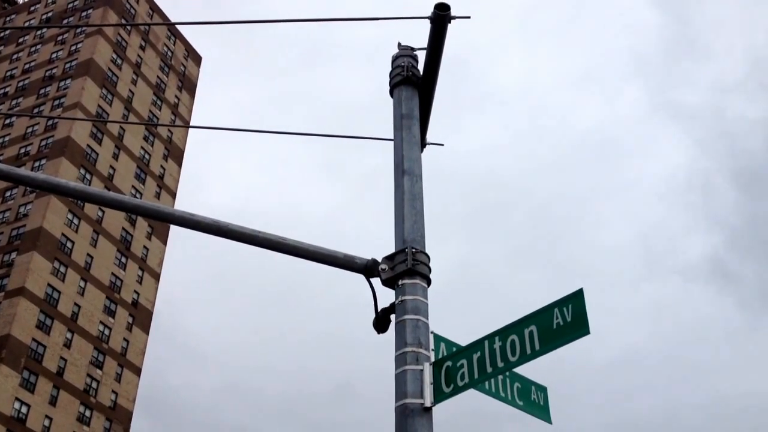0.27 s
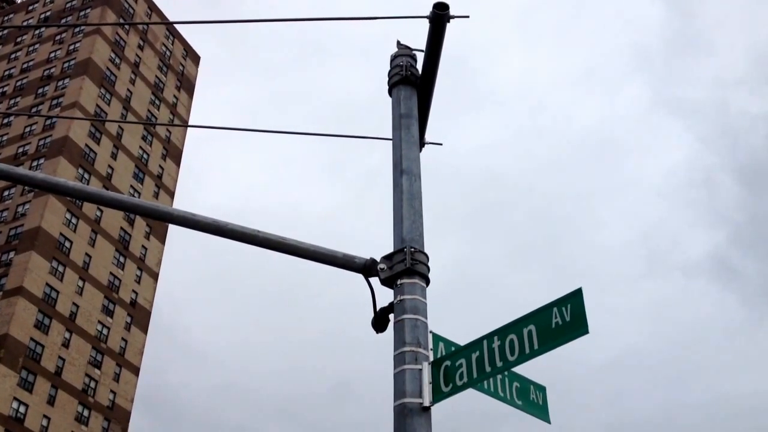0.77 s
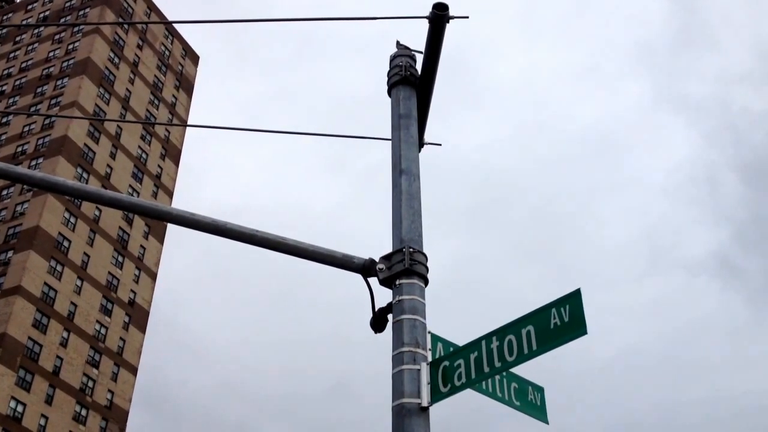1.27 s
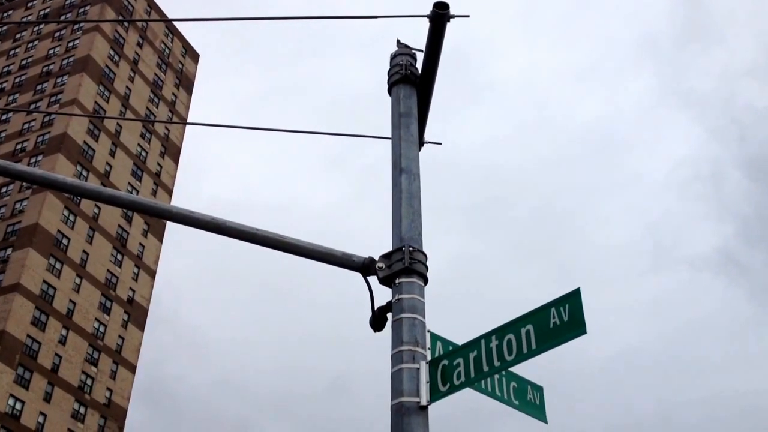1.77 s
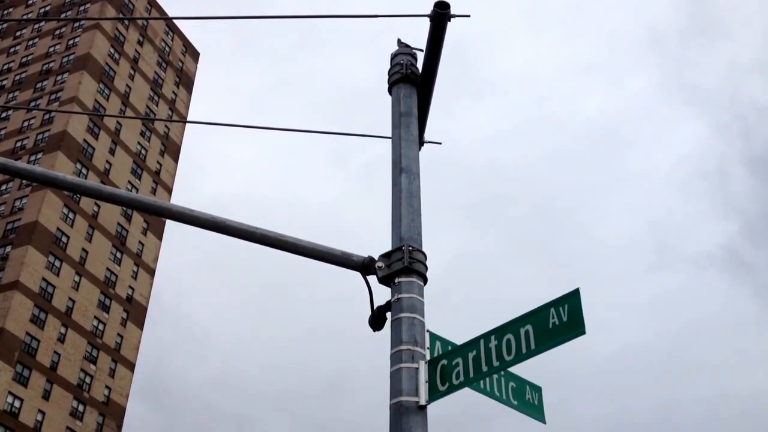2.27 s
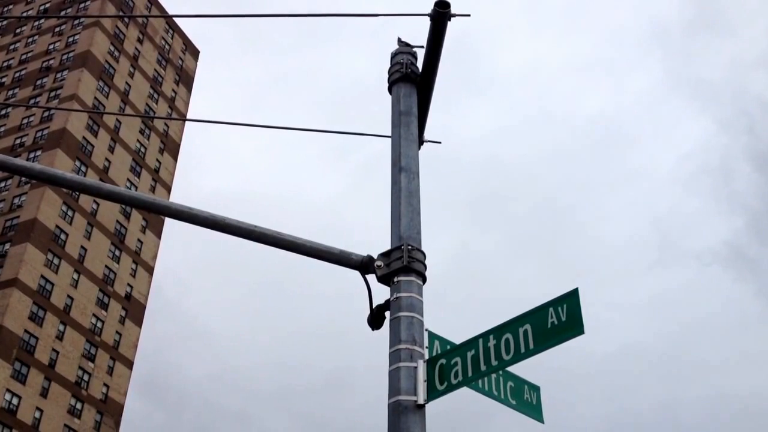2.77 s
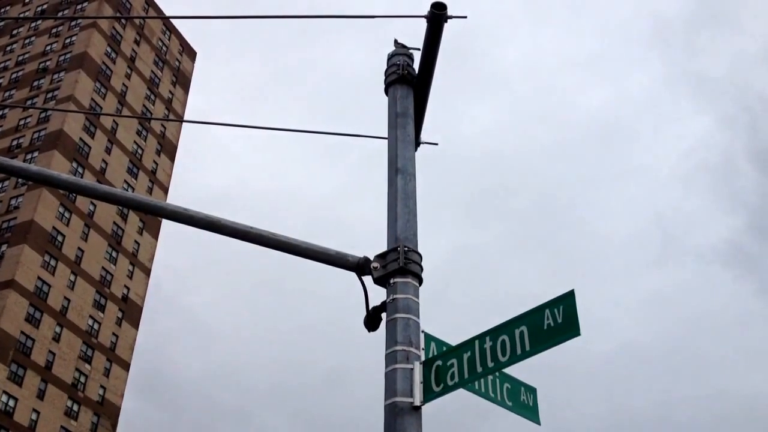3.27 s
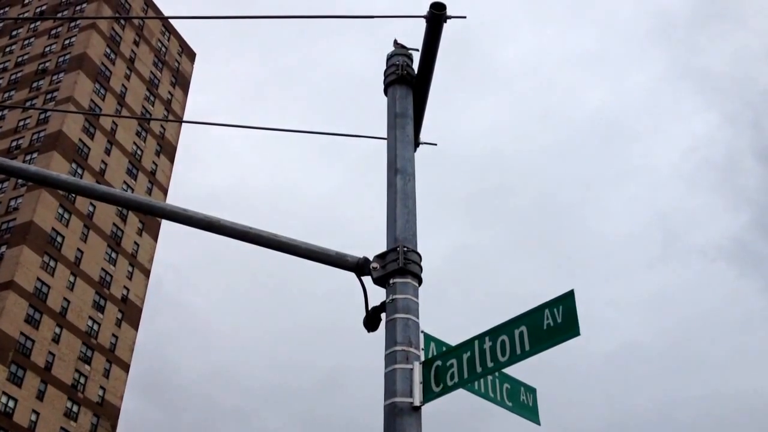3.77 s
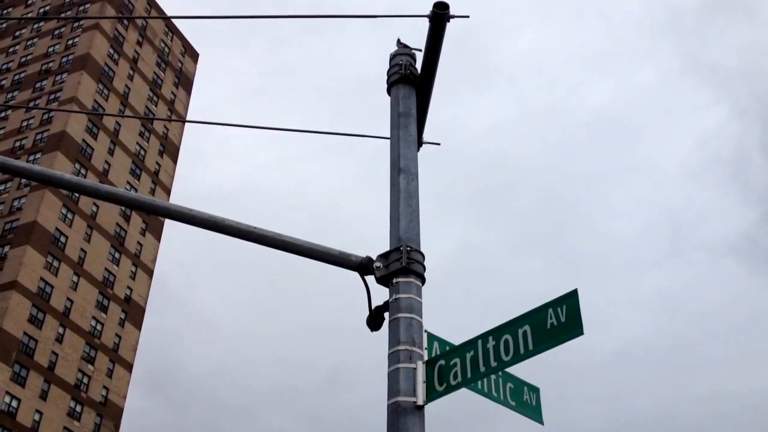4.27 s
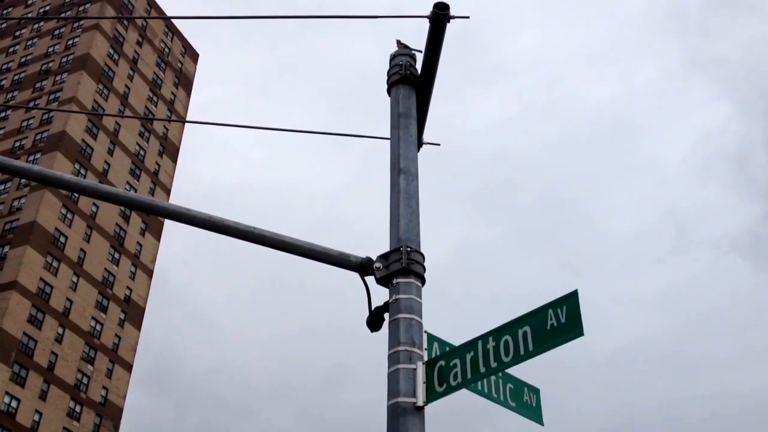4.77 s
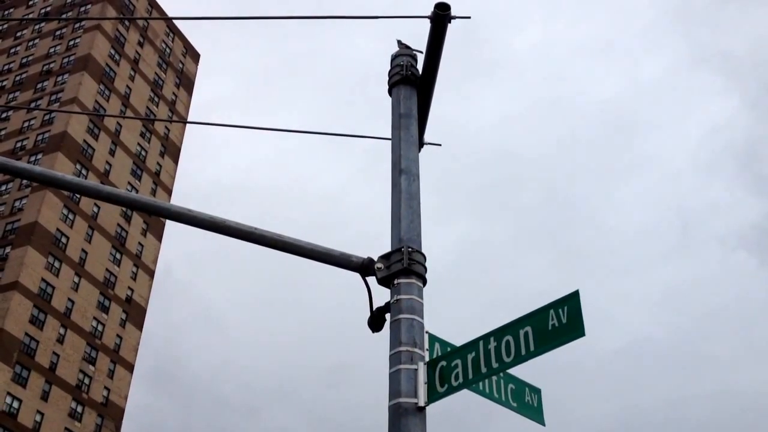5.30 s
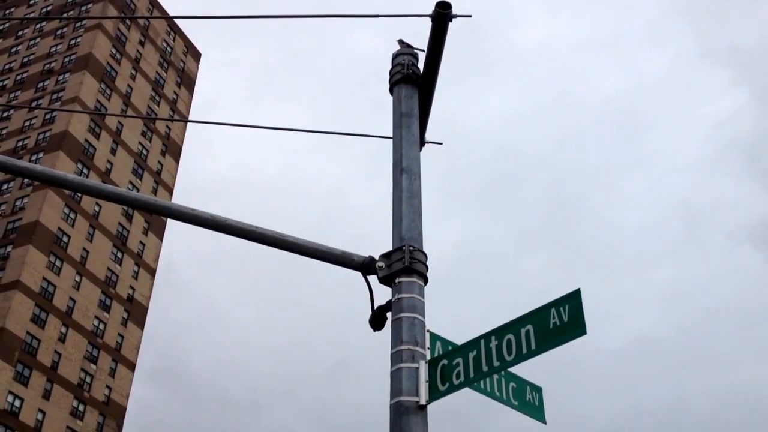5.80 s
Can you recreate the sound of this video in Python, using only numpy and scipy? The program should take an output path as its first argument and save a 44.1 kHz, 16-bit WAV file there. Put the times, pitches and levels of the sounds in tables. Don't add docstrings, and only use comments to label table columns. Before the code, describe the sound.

A small songbird gives short, sharp, downward-slurring chirps from a street pole over a steady low wash of city traffic and soft wind thumps.

```python
import sys
import numpy as np
from scipy import signal
from scipy.fft import rfft, irfft, next_fast_len
from scipy.io import wavfile
from scipy.ndimage import uniform_filter1d

SR = 44100
rng = np.random.default_rng(int(sys.argv[2]) if len(sys.argv) > 2 else 0)


def store_wav(level_fs):
    pcm = np.round(np.clip(np.atleast_2d(level_fs), -1, 1) * 32767)
    wavfile.write(sys.argv[1], SR, pcm.T.astype(np.int16))


def boost_factor(decibels):
    exponent = np.asarray(decibels, float) / 20
    return 10 ** exponent


N = 266319

# (time [s], level [dB])
TRAFFIC = [(0, -1.5), (.94, 1.5), (1.77, -2), (2.67, -.4), (3.33, 1.1), (4.29, .6), (5.6, -.4), (6.04, .4)]
# (time [s], level above the quiet drone [dB], length [s])
SURGES = [(0, 9, .12), (.45, 14, .13), (.8, 10, .06), (1.1, 9, .1), (1.38, 10, .08), (1.93, 11, .14),
          (2.6, 8, .15), (2.95, 12, .14), (3.6, 5, .08), (5.05, 8, .15), (5.8, 6, .2), (6.04, 9, .1)]
# (frequency [Hz], level per Hz [dB])
CITY = [(24, -56), (50, -28), (105, -9.5), (150, -3.5), (300, -.5), (438, -8.5), (621, -9.5), (1190, -13.5),
        (1960, -16.5), (2450, -24.5), (2900, -31.5), (4350, -28.5), (8110, -42.5), (15500, -51.5)]

STEP = [(0, 4100, -43, -8, .05), (.008, 5090, -22, -22, .01), (.033, 4920, -17, -17, .01),
        (.039, 5180, -31, -1, .04), (.044, 4950, -45, -4, .05), (.0475, 4050, -18, -13, .1),
        (.052, 3250, -30, -3, .1), (.068, 3180, -26, -22, .07), (.080, 3250, -36, -13, .03)]
SLUR = [(-.022, 1450, -44, 3, .7), (-.0105, 2480, -30, 0, .25), (-.002, 3690, -32.5, -3, .5),
        (.007, 4440, -22.5, -7, .1), (.028, 4294, -20, -12, .06), (.0503, 4230, -15.5, -11, .06),
        (.0525, 3150, -29, -4, .3), (.058, 2330, -23, -8, .45), (.080, 1540, -42, 0, .67)]
JUMP = [(-.003, 1338, -56, 3, .7), (.005, 2146, -39, 6, .62), (.011, 2950, -33, 1, .45),
        (.015, 4115, -38, 0, .22), (.021, 4950, -19, -10, .08), (.030, 4705, -20, -22, .11),
        (.034, 4860, -19, -10, .09), (.039, 4130, -20, -7, .1), (.043, 3500, -33, -2, .2)]
STAIRS = [(0, 3540, -31, -2, .2), (.003, 3970, -24, -7, .1), (.009, 4314, -17, -11, .06),
          (.019, 3900, -19, -15, .08), (.0245, 4060, -18.5, -18, .08), (.028, 3430, -32, -12, .5),
          (.034, 2880, -20, -13, .22), (.048, 2525, -25, -30, .09), (.054, 2400, -28, -20, .18)]
LOW_CHIRP = [(0, 3240, -45, -13, .05), (.008, 3020, -23.5, -21, .01), (.016, 2790, -21.5, -24, .01),
             (.025, 2684, -11.5, -36, .01), (.030, 2650, -33, -38, .006), (.042, 2700, -43, -38, .05)]
HIGH_CHIRP = [(0, 4710, -56, -12, .05), (.009, 4350, -37, -8, .05), (.020, 4200, -26.5, -10, .05),
              (.032, 3880, -25.5, -12, .045), (.042, 3590, -28, -8, .1), (.056, 3500, -30.5, -19, .12),
              (.068, 3360, -44, -21, .05)]
# (shape, start [s], hold stretched by [s], pitch factor,
# upward hook ending the hold [0-1], level [dB])
SONG = [(STEP, .1496, 0, 1.0, 0, 0.1), (STEP, .728, 0, 1.02, 0, -2), (JUMP, 1.992, 0, .99, 0, .1),
        (STAIRS, 2.0335, 0, .99, 0, .1), (SLUR, 2.5715, -.00092, 1.002, .04, -1.2),
        (SLUR, 3.4465, -.00097, .99, .055, -1.2), (SLUR, 3.930, .0065, .98, .0089, .2),
        (SLUR, 4.498, .0035, 1.003, .069, -1.9), (SLUR, 4.9385, .004, 1.014, .044, .1),
        (SLUR, 5.3955, .0, .99, .013, .4), (LOW_CHIRP, 5.847, 0, 1.0, 0, .1),
        (HIGH_CHIRP, 5.962, 0, .99, 0, .1)]
# (frequency [Hz], width [Hz], level [dB])
WINDPIPE = [
    (4545, 1226, 0),
    (9320, 660, -6),
    (12900, 2350, -4.5),
]
# (strongest echo delay [s], its level [dB])
FRONTS = [(.1, -38), (.15, -35), (.1, -41), (.1, -41), (.16, -37), (.068, -32), (.07, -36), (.063, -28),
          (.085, -27), (.14, -32.5), (.07, -30), (.09, -32)]

# (time [s], level [dB], pitch [Hz])
GUSTS = [(.46, -20, 231), (.49, -20, 228), (.53, -33, 300), (.736, -25, 190), (.796, -32, 300),
         (1.1, -19.5, 230), (1.929, -27, 272), (2.314, -27.5, 280), (2.609, -32, 129), (2.629, -20, 168),
         (2.969, -31, 215), (5.129, -30, 318), (5.909, -27.5, 223), (6.019, -26, 140)]
# (time [s], peak level [dB])
TICKS = [(0.3944, -46), (0.4534, -43), (1.7894, -51), (2.4194, -46), (3.2605, -44), (4.1594, -48)]

CAR_S, CAR_LENGTH_S, CAR_DB = 4.8, .5, 1.2
BRAKE_S, BRAKE_LENGTH_S, BRAKE_DB = 4.2, .25, 3.5
TYRE_SHARE, HISS_SHARE = .1, -.6
HUM_HZ, HUM_DB = 122.3, -54
HOLD_S = .052
EVEN_DB, EVEN_LIFT_DB, EVEN_PITCH_HZ, EVEN_WIDTH_HZ = -4, 12, 2500, 600
PAVEMENT_S, PAVEMENT_DB = .0105, -15
NEAR_DB, NEAR_T60_S = -25, .08
TAIL_DB, STREET_T60_S = -26.5, 1.2
THUMP_T60_S = .043
TOP_HZ = 15550


def shape(x, gain):
    size = next_fast_len(len(x) + 2048)
    hz = np.fft.rfftfreq(size, 1 / SR) + 1e-9
    return irfft(rfft(x, size) * gain(hz), size)[:len(x)]


def ring(f, hz, width):
    return 1 / (1 + 1j * (f / hz - hz / f) * hz / width)


def unit(x):
    return x / np.sqrt(np.mean(x ** 2))


def bump(t, s, length):
    return np.exp(-((t - s) / length) ** 2)


def walk(rate):
    k = int(SR / rate)
    steps = np.repeat(rng.standard_normal(N // k + 1), k)
    smooth = uniform_filter1d(uniform_filter1d(steps, k), k)
    return unit(smooth[:N])


def fading(t60, db, count):
    tail = rng.standard_normal(count) * boost_factor(-60 * np.arange(count) / SR / t60)
    return tail * boost_factor(db) / np.sqrt(np.sum(tail ** 2))


def traffic():
    t, size = np.arange(N) / SR, next_fast_len(N)
    low = np.interp(t, *np.transpose(TRAFFIC))
    mid = TYRE_SHARE * low + CAR_DB * bump(t, CAR_S, CAR_LENGTH_S)
    deep = sum(db * bump(t, s, length) for s, db, length in SURGES)
    hiss = 1.2 + HISS_SHARE * low + BRAKE_DB * bump(t, BRAKE_S, BRAKE_LENGTH_S)
    swells = np.array([deep - np.mean(deep), low, mid, mid, hiss + 0.36 * walk(25.07)])

    hz, db = np.transpose(CITY)
    octave = np.log2(np.fft.rfftfreq(size, 1 / SR) + 1e-9)
    wash = rfft(rng.standard_normal(size)) * boost_factor(np.interp(octave, np.log2(hz), db))
    out = 0
    for centre in np.arange(4.5, 14.6, .5):
        band = irfft(wash * np.clip(1 - abs(octave - centre) / .5, 0, 1), size)[:N]
        place = np.interp(centre, [7, 7.5, 9.5, 11, 12.5], range(5))
        share = np.clip(1 - abs(place - np.arange(5)), 0, 1)
        flicker = np.interp(centre, [7, 10], [1.2, .5]) * walk(9)
        out = out + band * boost_factor(share @ swells + flicker)

    hum_hz = HUM_HZ * (1 + 0.01507 * walk(1.8))
    hum = np.sin(2 * np.pi * np.cumsum(hum_hz) / SR) * boost_factor(HUM_DB + 3.1 * walk(3))
    return unit(out) * boost_factor(-38.5) + hum * np.sqrt(2)


def windpipe(f):
    total = 0
    for k, (hz, width, db) in enumerate(WINDPIPE):
        total = total + (-1) ** k * boost_factor(db) * ring(f, hz, width)
    return total / (1 + (f / 14300) ** 12)


def note(table, stretch, up, hook, level_db, flutter):
    s, *columns = np.transpose(table)
    s = s + stretch * np.clip(s / HOLD_S, 0, 1)
    t = np.arange(s[0], s[-1], 1 / SR)
    hz, db, over_db, hoarse = (uniform_filter1d(np.interp(t, s, c), size=36) for c in columns)
    pitch_shake, level_shake, breath, beak_noise = flutter[:, :len(t)]
    even_db = EVEN_DB + EVEN_LIFT_DB * bump(hz, EVEN_PITCH_HZ, EVEN_WIDTH_HZ)

    tight = hook * bump(t, HOLD_S + stretch - 0.0048, 0.00291)
    hz = hz * up * (1 + tight) * (1 + 0.041 * hoarse * pitch_shake)
    phase = 2 * np.pi * np.cumsum(hz) / SR
    tone = np.sin(phase)
    for k in range(2, 14):
        overtone = boost_factor(over_db - 3.5 * (k - 1.5) + even_db * (k % 2 == 0)) * np.sin(k * phase)
        tone = tone + (k * hz < .45 * SR) * overtone

    edge = np.clip(np.minimum(t - s[0], s[-1] - t) / 0.0017, 0, 1)
    swell = boost_factor(db - 71 * tight + level_db) * np.sqrt(2) * edge
    air = 1.3 * hoarse * breath
    voice = shape(swell * (tone * (1 + 1.46 * hoarse * level_shake) + air), windpipe)
    beak = shape(swell * hoarse ** .25 * beak_noise,
                 lambda f: ring(f, 8900, 9000) / (1 + (f / 14000) ** 16))
    return s[0], voice + boost_factor(-27.5) * beak


def street(delay, echo_db):
    far = fading(STREET_T60_S, TAIL_DB, count=SR)
    far[:int(.04 * SR)] = 0
    far[int(delay * SR)] += boost_factor(echo_db)
    path = shape(far, lambda f: 1 / (1 + (f / 8000) ** 4))
    path[:SR // 10] += fading(NEAR_T60_S, NEAR_DB, count=SR // 10)
    path[int(PAVEMENT_S * SR)] += boost_factor(PAVEMENT_DB)
    path[0] = 1
    return path


def bird():
    out = np.zeros(N + 2 * SR)
    for (table, start, *style), fronts in zip(SONG, FRONTS):
        flutter = np.array([unit(uniform_filter1d(rng.standard_normal(SR // 4), size=n))
                            for n in (40, 12, 1, 1)])
        lead, sound = note(table, *style, flutter)
        sound = signal.fftconvolve(sound, street(*fronts))
        out[int((start + lead) * SR):][:len(sound)] += sound
    return out[:N]


def handling():
    out, t = np.zeros(N + SR), np.arange(SR // 10) / SR
    for s, db, hz in GUSTS:
        fade = np.clip(t / 0.0054, 0, 1) * boost_factor(db - 60 * t / THUMP_T60_S + 3.5)
        out[int(s * SR):][:len(t)] += np.sin(2 * np.pi * hz * t) * fade
    for s, db in TICKS:
        grit = shape(rng.standard_normal(len(t)), lambda f: ring(f, 8500, 9000))
        out[int(s * SR):][:len(t)] += unit(grit) * boost_factor(db - 60 * t / 0.011 - 7)
    return out[:N]


def scene():
    return (traffic() + bird() + handling())[None]


def band_limit(x):
    return signal.sosfilt(signal.butter(12, 15650, fs=SR, output="sos"), x)


def record(dry):
    stop = np.clip((N - np.arange(N)) / (.003 * SR), 0, 1)
    mix = shape(dry[0] * stop, lambda f: 1. * (f < TOP_HZ))
    return band_limit(mix[None])


dry = scene()
out = record(dry)
store_wav(out)
```